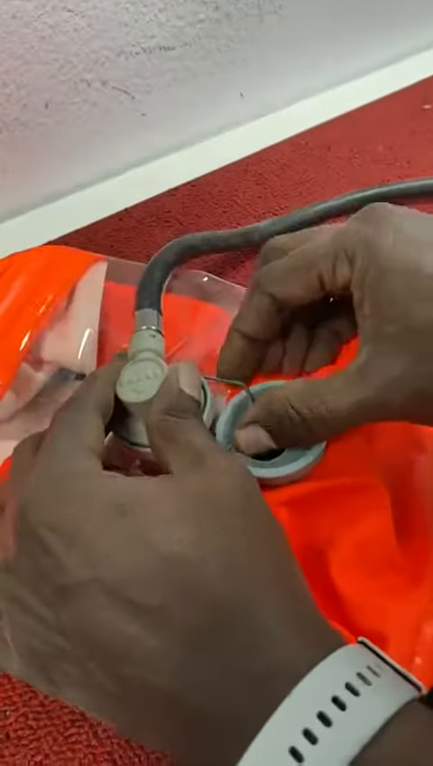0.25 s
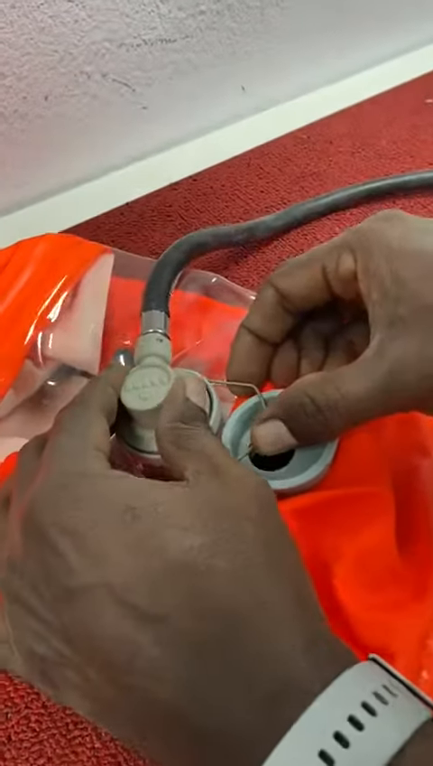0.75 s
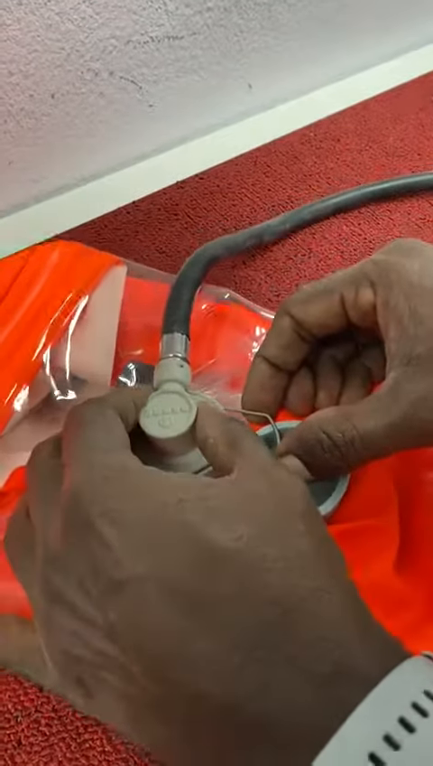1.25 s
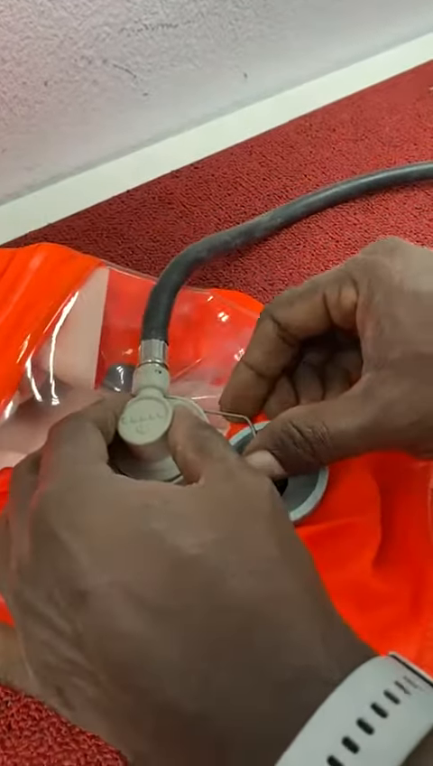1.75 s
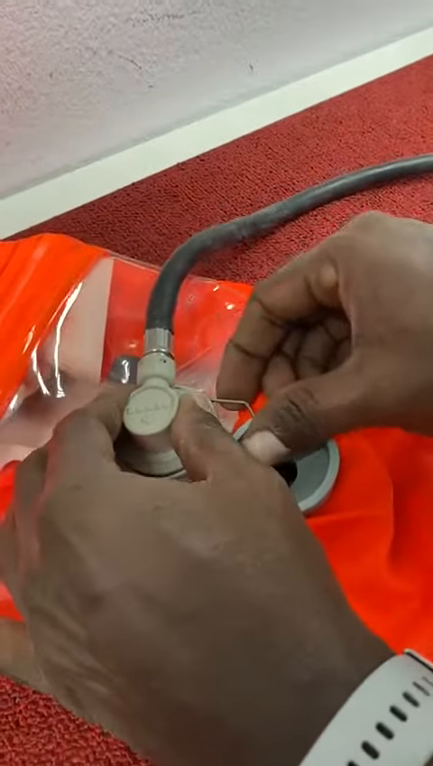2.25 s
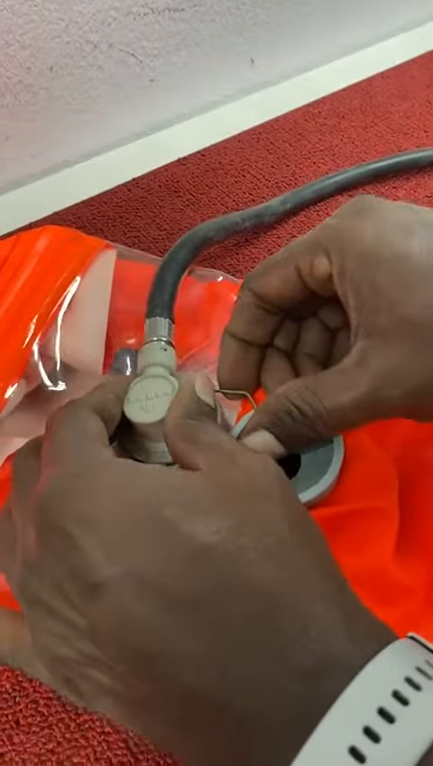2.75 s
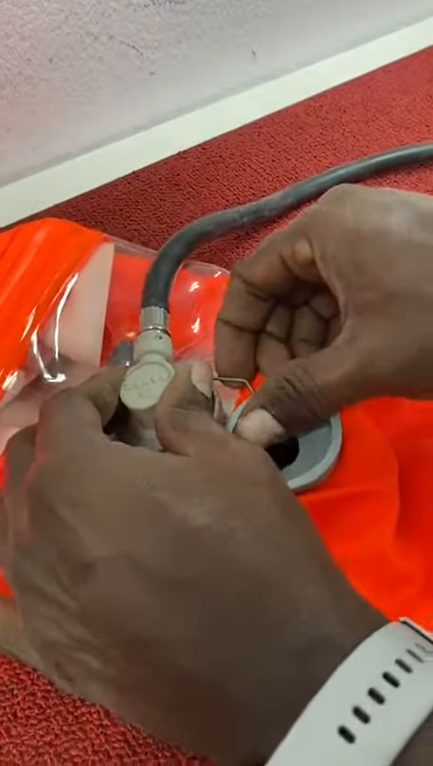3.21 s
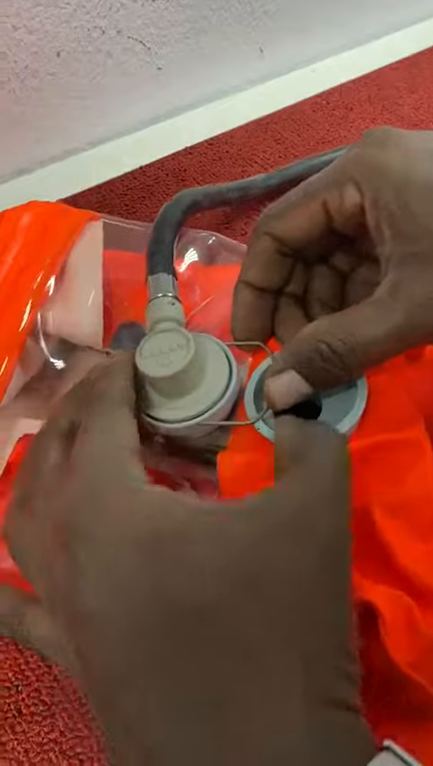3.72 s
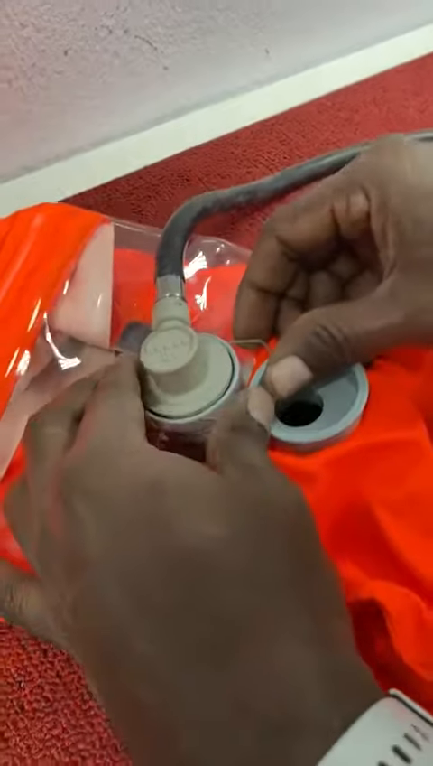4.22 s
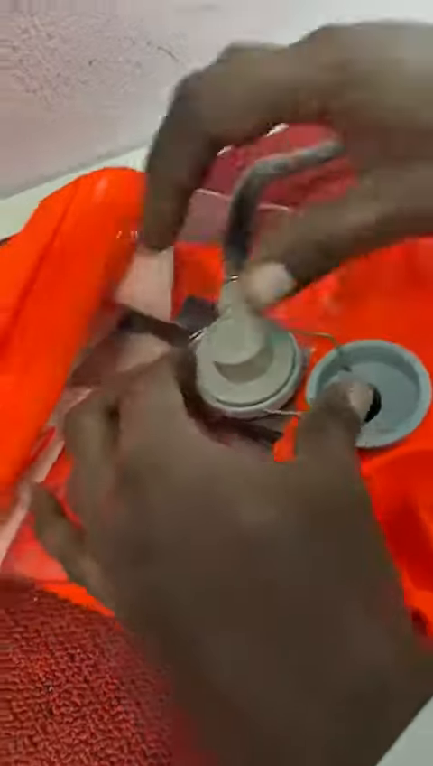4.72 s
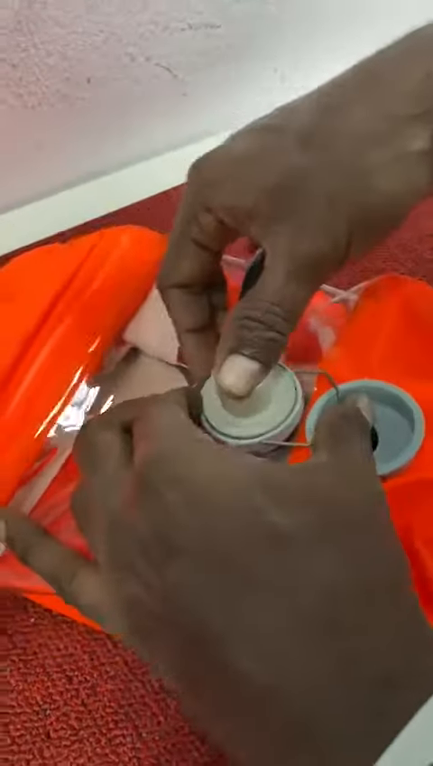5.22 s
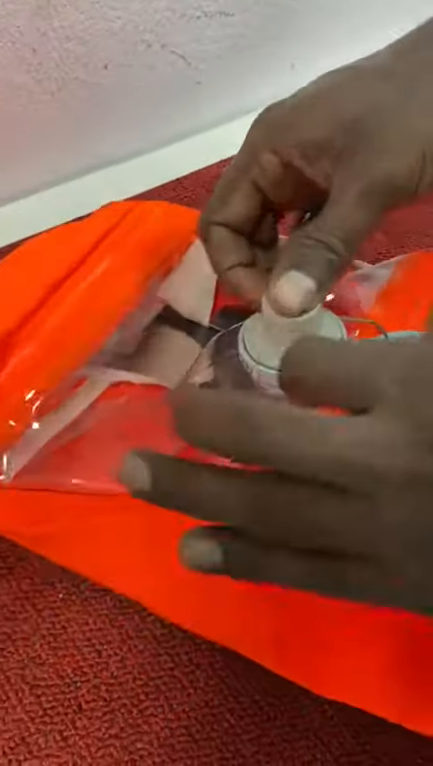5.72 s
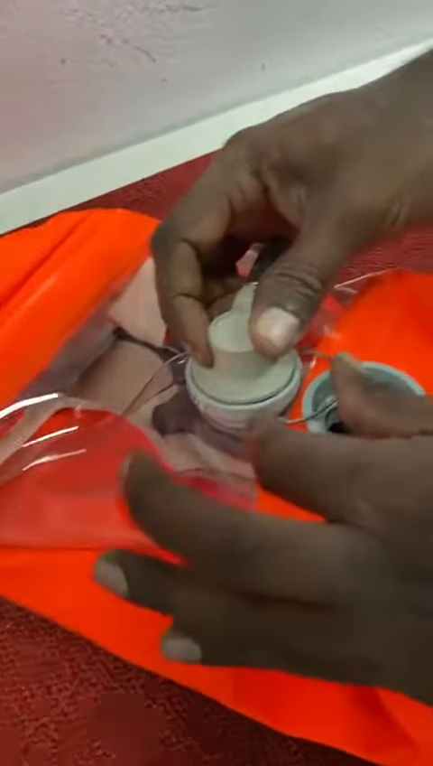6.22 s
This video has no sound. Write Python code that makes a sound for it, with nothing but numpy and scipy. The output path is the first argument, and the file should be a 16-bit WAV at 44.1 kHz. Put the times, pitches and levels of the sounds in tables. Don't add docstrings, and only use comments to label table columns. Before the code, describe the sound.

Throughout, a ventilation machine drones indoors: a deep, pure hum that rises and sinks irregularly, a lower motor tone wavering beneath it, boomy room rumble and a steady soft hiss with faint whistling tints from a duct. The hum is weak and dipping in the first second and a half, swells near 1.9, sags around 2.5, then grows stronger from 3.5, fullest near 5.2, before dropping toward 5.9. Close by, a hand faintly rubs vinyl at the start; a small hollow pop comes at 1.3 and a sharp, bright plastic tick at 1.9. Light crinkles and barely audible clicks appear from 3.4 to 4.0. Between 4.5 and 4.9 there is a cluster of soft dull pops and weak clicks with rustling, then a firm plastic tick at 5.2. A few faint pops and a crinkle follow until 5.6; the drone continues to the end at about 6.5. The treble is dull, the stereo image close.

```python
import sys
import numpy as np
from scipy import signal
from scipy.fft import rfft, irfft, next_fast_len
from scipy.io import wavfile
from scipy.ndimage import uniform_filter1d, map_coordinates

SR = 44100
rng = np.random.default_rng(int(sys.argv[2]) if len(sys.argv) > 2 else 0)


def log_audio(samples):
    frames = np.atleast_2d(samples).T
    limited = np.clip(frames, -1, 1)
    pcm = np.round(limited * 32767).astype(np.int16)
    wavfile.write(sys.argv[1], SR, pcm)


def level_to_linear(level):
    exponent = np.asarray(level, float) / 20
    return 10 ** exponent


N = 284886

# t/s, level/dB
BLADE_LEVEL = [(.12, -33), (.32, -46), (.42, -35), (.76, -38.5), (.85, -46), (1.62, -33.5), (1.76, -38.5),
               (1.9, -28), (2.25, -34), (2.45, -42), (2.85, -32), (3.55, -28), (3.85, -31), (4.15, -26.5),
               (4.45, -30.5), (5.2, -25), (5.78, -29.5), (5.93, -39)]
# t/s, peak level/dB, half length/s
OCTAVE_SWELLS = [(.55, -43, 0.44), (1.5, -46.5, 0.27), (2.15, -42, 0.26), (3.15, -41.5, 0.55),
                 (4.0, -43.5, 0.082), (4.5, -46.5, 0.3), (5.1, -44.5, 0.12), (5.85, -39.5, 0.36),
                 (6.4, -40, 0.1)]
# t/s, peak level/dB, half length/s
MOTOR_SURGES = [(.3, -43, 0.42), (1.0, -38.5, 0.13), (1.45, -39.5, 0.26), (2.03, -33.5, 0.088),
                (2.8, -39.5, 0.06), (3.3, -36.5, 0.25), (4.05, -40, 0.15), (4.5, -39, .15), (4.9, -36, .12),
                (5.4, -41, 0.19), (5.72, -41, 0.093), (6.0, -36, .13), (6.3, -39, 0.058)]
# t/s, crack level/dB, body level/dB, body tilt/(dB per octave), port difference/dB
TICKS = [
    (1.8998, -29.5, -30.5, 1.5, -1),
    (3.802, -56, -58, 0, -3),
    (4.568, -56, -55, 0, -3),
    (4.938, -59, -52, -3, -3),
    (5.2024, -42.5, -32, -3, -3),
]
# f/Hz, width/Hz, level/dB
CRACK_COLOUR = [
    [(9550, 2800, 3.5), (8300, 600, -2)],
    [(7600, 2500, 6), (10500, 2500, -7)],
]
# f/Hz, level/dB, t60/s
VALVE_MODES = [(1150, -7, .012), (1900, -2, .009), (2500, 0, .009), (3300, -1, .008), (4300, 0, .008),
               (4900, 0, .009), (5900, -4, .007), (6700, -10, .006)]
# f/Hz, width/Hz, level/dB
RELEASE_COLOUR = [(3500, 3600, 0)]
# t of the peak/s, level/dB, f/Hz, fall over the pop/octaves, half length/s
POPS = [(1.284, -41, 700, .5, .002), (1.331, -29, 560, 1.5, .003), (1.349, -44, 1600, .4, .002),
        (1.906, -39, 650, .5, .004), (3.447, -38, 550, .8, .003), (4.473, -32, 640, 1.1, .0025),
        (4.509, -36, 850, 1.2, .002), (4.561, -40, 980, .8, .0025), (4.586, -40, 800, .3, .004),
        (4.71, -43, 750, .5, .003), (4.817, -39, 620, .6, .003), (4.84, -40, 650, .6, .003),
        (4.868, -38, 570, .6, .003), (4.938, -40, 860, .6, .003), (5.404, -45, 800, .3, .004),
        (5.466, -38, 580, .3, .004), (5.572, -37, 790, .3, .007)]
# t/s, level over the rustle/dB, half length/s
PUFFS = [(3.376, 8, 0.036), (3.794, 11.5, 0.029), (3.901, 5, 0.017), (3.972, 7.5, 0.022),
         (4.588, 11.5, 0.031), (4.81, 3, .03), (4.925, 7, 0.034), (5.58, 6, 0.11)]
# t/s, level over the rustle/dB, half length/s
RUBS = [
    (0.208, 2, 0.46),
    (4.752, 2, 0.33),
]
# f/Hz, level/dB per Hz
RUSTLE_TOP = [(4590, -41), (7800, -21), (8580, 2.5), (10300, 4.5), (10900, -1), (11400, 3), (11900, -10.5),
              (15500, -54), (22000, -120)]
# f/Hz, level/dB per Hz
RUSTLE_APART = [(4000, -61.5), (5400, -9.5), (6100, 1), (7200, -2), (8300, -5.5), (9100, -11.5),
                (10000, -30), (12000, -82)]
# t/s, level/dB
SQUEAL = [(0, -72), (.3, -85), (.8, -77), (1.1, -100), (6.46, -110)]
# t/s, level/dB
FLOW = [(0, 0), (.8, -2), (1.5, 1), (2.2, -2), (3.0, -0.5), (4.7, 1.5), (5.5, 0), (6.2, 1), (6.46, -0.5)]
# f/Hz, level/dB per Hz
RUMBLE = [(25, -31), (40, -10), (100, -10), (200, -12.5), (350, -17.5), (500, -40.5), (700, -84)]
# f/Hz, width/Hz, level/dB
ROOM_MODES = [(46.7, 7.4, -8.5), (66.1, 12, -2), (85, 2.7, -8), (131.5, 22, -3), (181, 20.5, -5),
              (231, 15, -10), (272.8, 13, -7.5), (342, 25, -17), (421.7, 28, -22)]
# f/Hz, level/dB per Hz
HISS = [(260, -24), (450, -2.5), (616, -5), (794, -4.5), (882, -7), (1210, -7), (1610, -9.5), (2980, -8),
        (3390, -11), (5710, -25), (6190, -29.5), (6700, -41), (7400, -57.5), (9400, -120)]
# f/Hz, level/dB per Hz
FLOW_APART = [(35, -62.5), (60, -36.5), (127, -14), (220, -12), (285, -5.5), (775, -6.5), (939, -10),
              (1210, -8), (2110, -11), (2970, -7.5), (4750, -19.5), (5400, -29), (6200, -50), (8000, -120)]
# f/Hz, width/Hz, level above the hiss/dB
DUCT_WHISTLES = [(794, 17, 7), (1020, 39, 3.5), (1196, 36, 5.5), (1446, 14, 6), (1956, 14, 8),
                 (3010, 48, 6), (2750, 96, 3)]
# f/Hz, left-minus-right share
LEAN = [(60, 0), (150, -.055), (300, -.19), (450, -.3), (680, -.3), (900, -.04), (1200, .05), (3500, .08),
        (5000, .02), (12000, 0)]
# f/Hz, share
LEAD = [(60, .008), (150, .03), (300, .08), (700, .32), (1300, .28), (2400, .5), (3300, .5), (5000, .1),
        (12000, 0)]
# f/Hz, level/dB per Hz
BAND_FLOOR = [(300, -150), (1500, -115), (3000, -89.5), (4000, -92.5), (5000, -101), (6000, -106),
              (7000, -108), (8500, -113), (10000, -118), (11800, -119)]

BLADE_HZ, SAG_HZ, SAG_S = 144.87, 1.189, 1.984
FLUTTER_DB = .9
OCTAVE_HZ = 290
THIRD_DB, THIRD_WANDER_DB = -62, 2
MOTOR_HZ, MOTOR_WANDER_HZ, MOTOR_BED_DB = 88.1, 1.2, -53
FLAT_TOP = 2.9
RELEASE_S = .0012
RATTLE_DB = -21
SCRAPE_DB = 16
RUSTLE_DB, RUSTLE_APART_DB = -77.5, -70
RUMBLE_DB, HISS_DB, FLOW_APART_DB = -36, -46.5, -50
HISS_GROWS = .24
TOP_HZ = 11950


def unit(x):
    return x / np.sqrt(np.mean(x ** 2) + 1e-20)


def along(points, hz):
    f, v = np.transpose(points)
    return np.interp(np.log(hz + 1), np.log(f + 1), v)


def envelope(rows):
    s, values = np.transpose(rows)
    return np.interp(np.arange(N) / SR, s, values)


def wobble(rate):
    knots = rng.standard_normal(int(N * rate / SR) + 4)
    return map_coordinates(knots, [np.arange(N) * rate / SR])


def humps(rows, t):
    return sum(db * np.exp(-((t - s) / half) ** 2) for s, db, half in rows)


def swells(rows):
    t = np.arange(0, N / SR + .01, .005)
    height = sum(level_to_linear(db) * np.exp(-np.abs((t - s) / half) ** FLAT_TOP) for s, db, half in rows)
    return envelope(np.transpose([t, height]))


def filtered(x, response):
    m = next_fast_len(len(x) + 8192)
    return irfft(rfft(x, m) * response(np.fft.rfftfreq(m, 1 / SR)), m)[:len(x)]


def peak(f, hz, width):
    return 1j * f * width / (hz * hz - f * f + 1j * f * width + 1e-9)


def modes(f, table):
    return sum(level_to_linear(db) * peak(f, hz, width) ** 2 for hz, width, db in table)


def rush(response, patchy_db):
    z = signal.stft(rng.standard_normal(N), nperseg=512)[2]
    field = rng.standard_normal(z.shape)
    field = uniform_filter1d(uniform_filter1d(field, 5, 0), 12, 1)
    patchy = signal.istft(z * level_to_linear(patchy_db * unit(field)), nperseg=512)[1][:N]
    return unit(filtered(patchy, response))


def blade_tones():
    t = np.arange(N) / SR
    hz = BLADE_HZ + SAG_HZ * np.exp(-t / SAG_S)
    turn = 2 * np.pi * np.cumsum(hz) / SR + .1 * wobble(12)
    blade = level_to_linear(envelope(BLADE_LEVEL) + FLUTTER_DB * wobble(14)) * np.sin(turn)
    octave_level = swells(OCTAVE_SWELLS) * level_to_linear(2.5 * wobble(15))
    octave = octave_level * np.sin(2 * np.pi * OCTAVE_HZ * t + .27 * wobble(10))
    third = level_to_linear(THIRD_DB + THIRD_WANDER_DB * wobble(9)) * np.sin(3 * turn + .5 * wobble(8))
    return np.sqrt(2) * (blade + octave + third)


def motor_tone():
    hz = MOTOR_HZ + MOTOR_WANDER_HZ * wobble(4)
    level = (swells(MOTOR_SURGES) + level_to_linear(MOTOR_BED_DB)) * level_to_linear(1.2 * wobble(8.3))
    return np.sqrt(2) * level * np.sin(2 * np.pi * np.cumsum(hz) / SR + .24 * wobble(10))


def valve_ring(t, body_db, tilt_db):
    ring = 0
    for hz, db, t60 in VALVE_MODES:
        decay = level_to_linear(db + tilt_db * np.log2(hz / 3000) - 60 * t / t60)
        ring = ring + decay * np.sin(2 * np.pi * (hz * t + rng.random()))
    ring = np.clip(t / RELEASE_S, 0, 1) ** 2 * ring
    click = 1. * (np.arange(len(t)) == round(RELEASE_S * SR))
    release = filtered(click, lambda f: modes(f, RELEASE_COLOUR) * level_to_linear(tilt_db * np.log2(f / 3000 + .1)))
    return level_to_linear(body_db) * ring + level_to_linear(body_db + SCRAPE_DB) * release


def valve_ticks():
    out, t = np.zeros((2, N + SR)), np.arange(SR // 10) / SR
    for s, crack_db, body_db, tilt_db, apart_db in TICKS:
        t60 = np.interp(body_db, [-56, -33], [.014, .006])
        shape = level_to_linear(-60 * np.abs(t - RELEASE_S) / np.where(t < RELEASE_S, .006, t60))
        shape = shape + level_to_linear(RATTLE_DB - 60 * t / .06)
        for port, gain_db in enumerate((0, apart_db)):
            slips = shape * np.sign(rng.standard_normal(len(t)))
            crack = filtered(slips, lambda f: modes(f, CRACK_COLOUR[port]))
            ring = valve_ring(t, body_db - 4 * port, tilt_db)
            out[port, round(s * SR):][:len(t)] += level_to_linear(gain_db) * (level_to_linear(crack_db) * crack + ring)
    return out[:, :N]


def cushion_pops():
    reach = SR // 40
    out, t = np.zeros(N + SR), np.arange(-reach, reach) / SR
    for s, db, hz, fall, half in POPS:
        pitch = hz * 2 ** (-fall * np.tanh(t / half) / 2)
        pop = np.exp(-(t / half) ** 2) * np.sin(2 * np.pi * np.cumsum(pitch) / SR)
        out[round(s * SR) - reach:][:len(t)] += level_to_linear(db) * pop
    return out[:N]


def vinyl_rustle():
    t = np.arange(N) / SR
    rub_db, puff_db = humps(RUBS, t), humps(PUFFS, t)
    flicker_db = .8 * wobble(60)
    top = rush(lambda f: level_to_linear(along(RUSTLE_TOP, f)), patchy_db=2.5)
    top = level_to_linear(RUSTLE_DB + rub_db + puff_db + flicker_db) * top
    squeal = level_to_linear(envelope(SQUEAL)) * rush(lambda f: peak(f, 9500, 160) ** 2, patchy_db=-1.5)
    apart = rush(lambda f: level_to_linear(along(RUSTLE_APART, f)), patchy_db=2.5)
    apart = level_to_linear(RUSTLE_APART_DB + rub_db + .6 * puff_db + flicker_db) * apart
    return np.array([top + squeal, apart])


def room_response(f):
    ringing = sum(np.abs(level_to_linear(db) * peak(f, hz, width) ** 2) ** 2 for hz, width, db in ROOM_MODES)
    return np.sqrt(level_to_linear(along(RUMBLE, f)) ** 2 + ringing)


def duct_response(f):
    return 1 + sum((level_to_linear(db) - 1) * np.abs(peak(f, hz, width)) ** 2 for hz, width, db in DUCT_WHISTLES)


def air_flow():
    flow_db = envelope(FLOW)
    rumble = level_to_linear(RUMBLE_DB + flow_db) * rush(room_response, patchy_db=0)
    hiss = rush(lambda f: level_to_linear(along(HISS, f)) * duct_response(f), patchy_db=1.23)
    hiss = level_to_linear(HISS_DB + HISS_GROWS * flow_db) * hiss
    apart = rush(lambda f: level_to_linear(along(FLOW_APART, f)) * duct_response(f), patchy_db=1.7)
    apart = level_to_linear(FLOW_APART_DB + HISS_GROWS * flow_db) * apart
    return rumble + hiss, apart


def scene():
    flow, apart = air_flow()
    mid = flow + blade_tones() + motor_tone() + cushion_pops()
    side = apart + filtered(mid, lambda f: along(LEAN, f) + 1j * along(LEAD, f))
    mid, side = np.array([mid, side]) + valve_ticks() + vinyl_rustle()
    return np.array([mid + side, mid - side])


def drop_weak_bands(dry):
    size = 2048
    hz, _, z = signal.stft([dry[0] + dry[1], dry[0] - dry[1]], SR, nperseg=size)
    density = np.abs(z / 2) ** 2 * size / (.75 * SR)
    band = density[:, :-1].reshape(2, -1, 8, z.shape[2]).mean(axis=2)
    band = np.repeat(band, 8, axis=1)
    z[:, :-1] *= band > level_to_linear(along(BAND_FLOOR, hz[:-1]))[:, None] ** 2
    z *= np.clip((TOP_HZ - hz) / 900, 0, 1)[:, None]
    mid, side = signal.istft(z / 2, SR, nperseg=size)[1][:, :N]
    return np.array([mid + side, mid - side])


def roll_off(x):
    return signal.sosfilt(signal.butter(12, 12040, fs=SR, output="sos"), x)


def record(dry):
    mix = drop_weak_bands(dry)
    return roll_off(mix)


dry = scene()
out = record(dry)
log_audio(out)
```